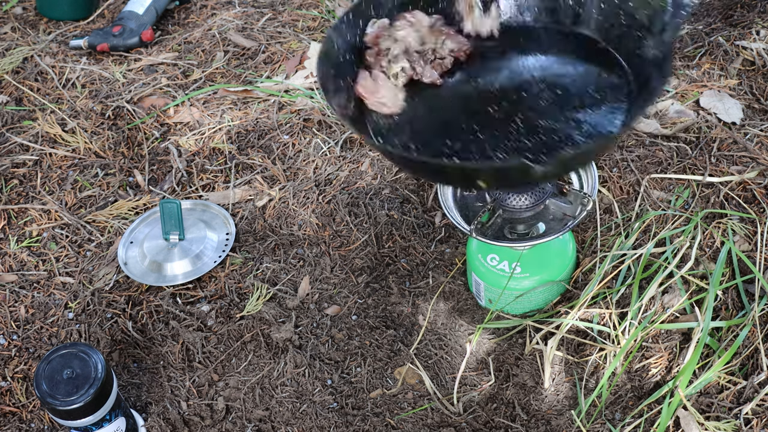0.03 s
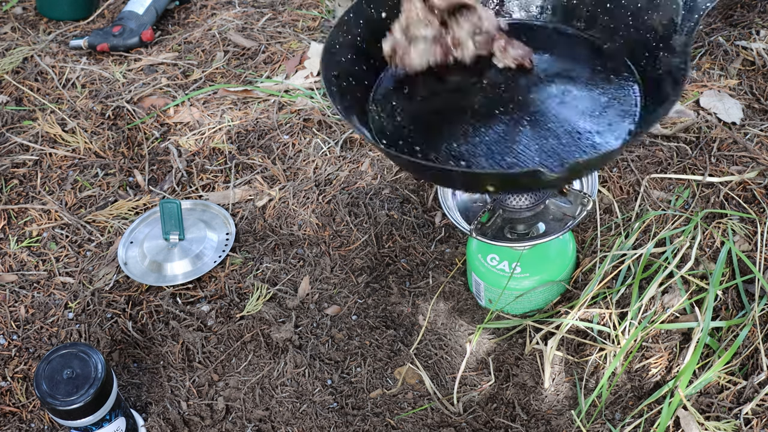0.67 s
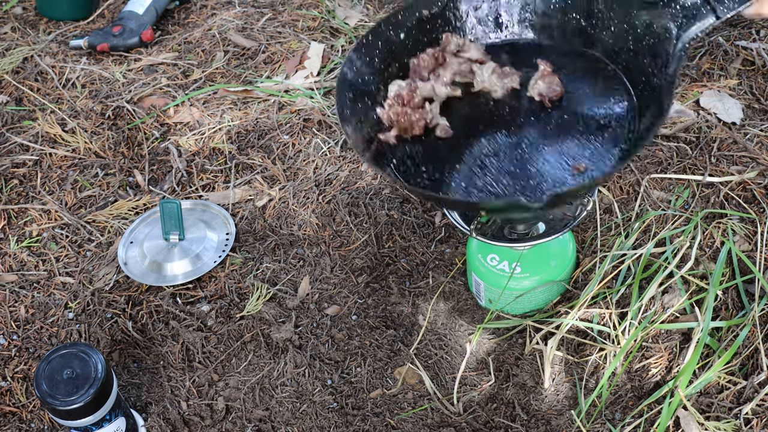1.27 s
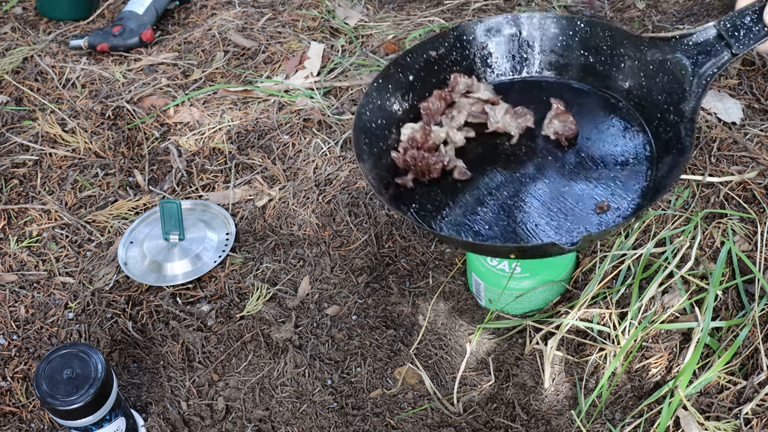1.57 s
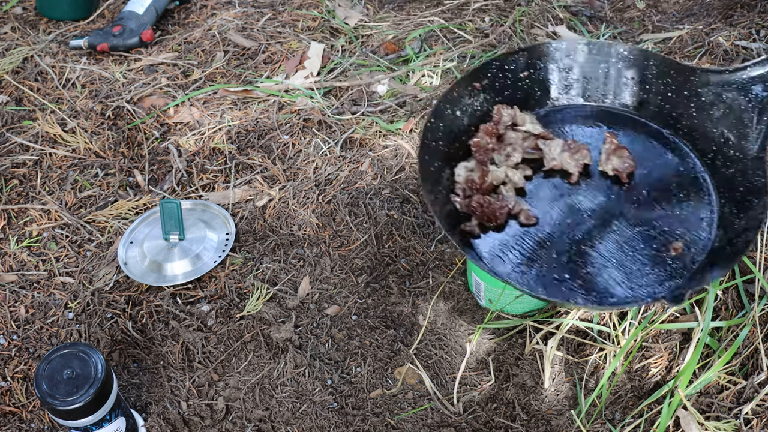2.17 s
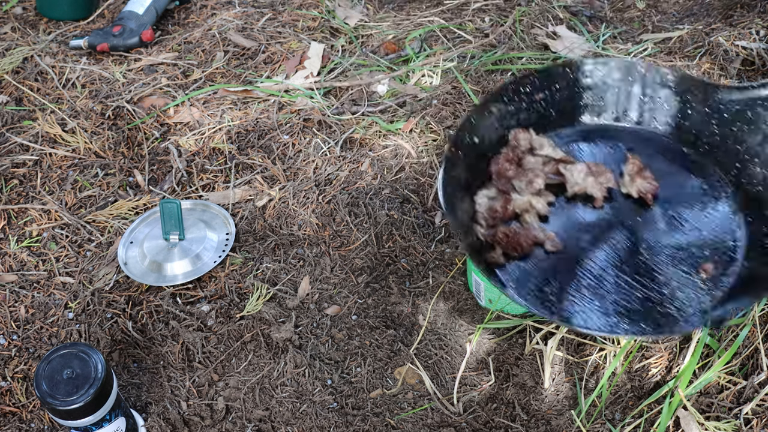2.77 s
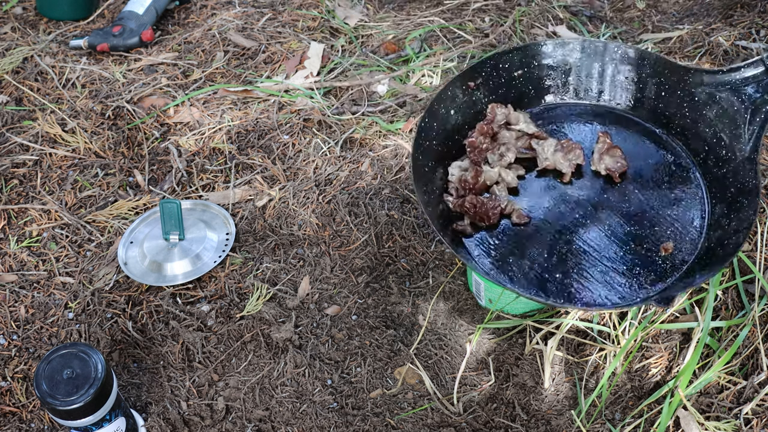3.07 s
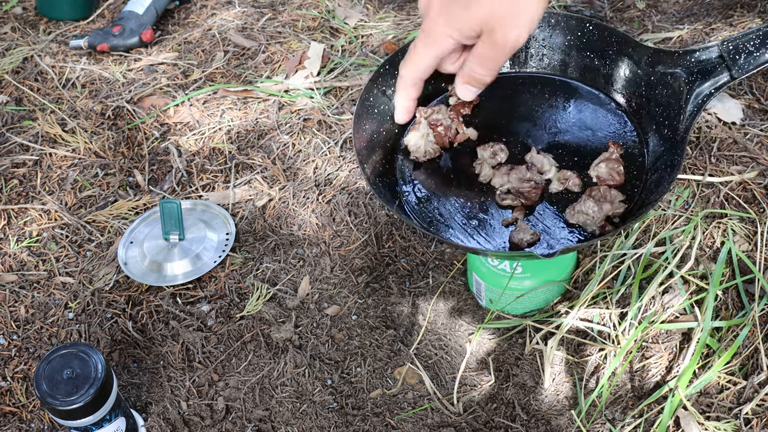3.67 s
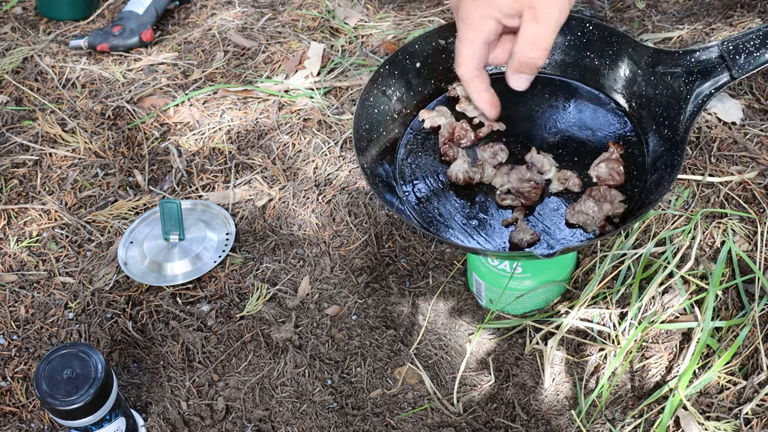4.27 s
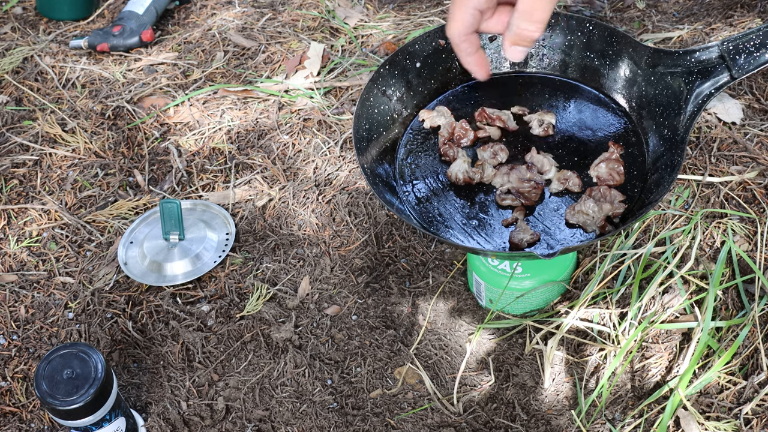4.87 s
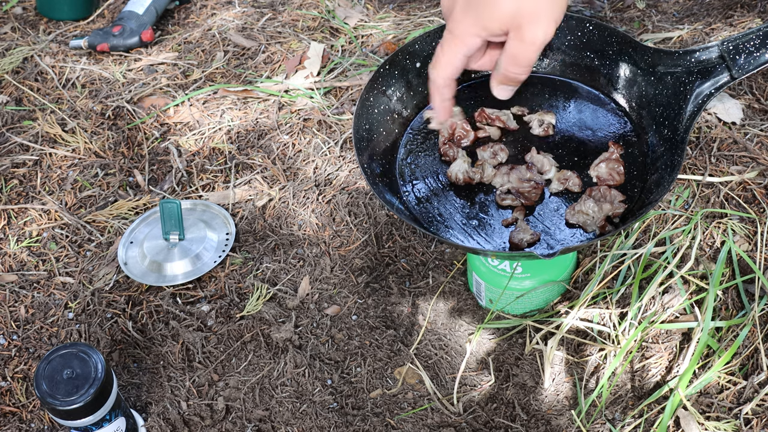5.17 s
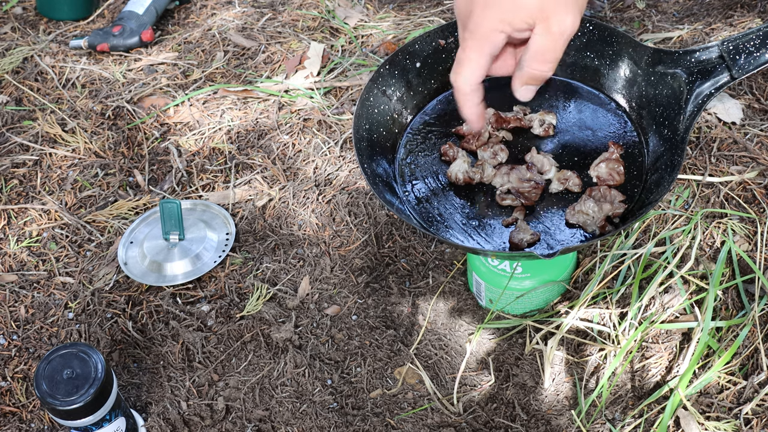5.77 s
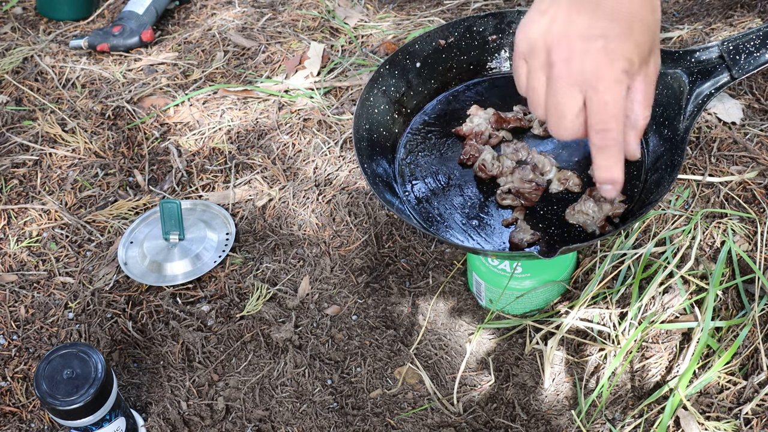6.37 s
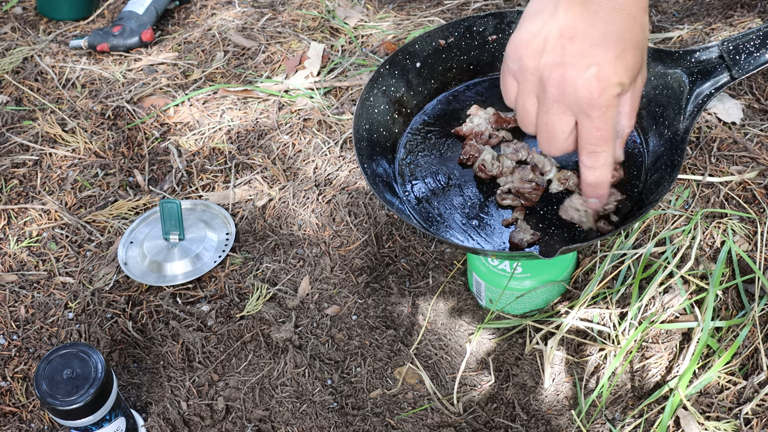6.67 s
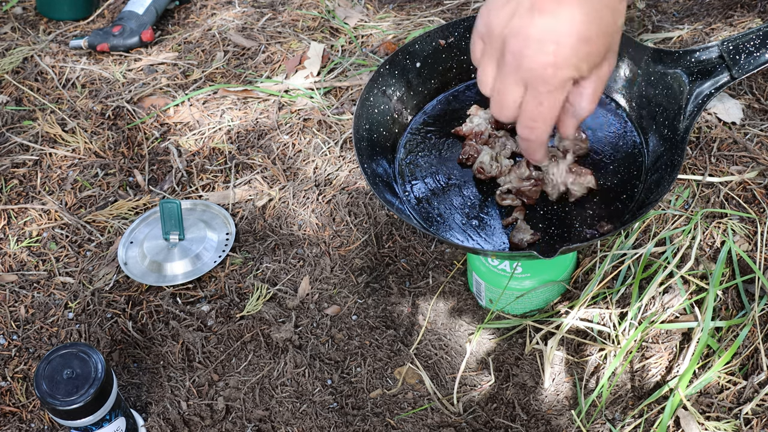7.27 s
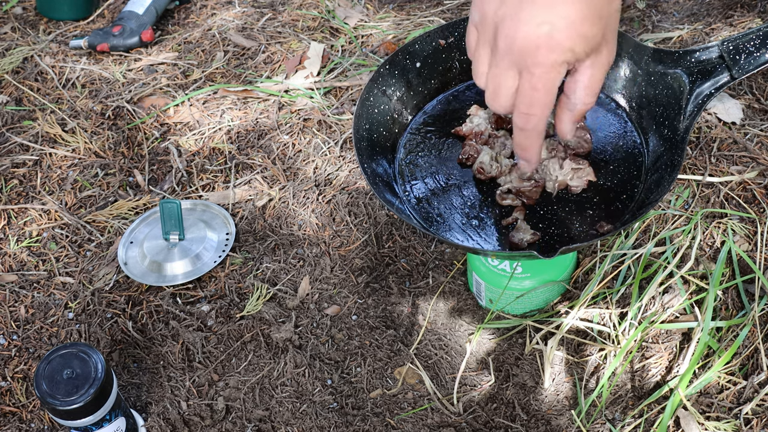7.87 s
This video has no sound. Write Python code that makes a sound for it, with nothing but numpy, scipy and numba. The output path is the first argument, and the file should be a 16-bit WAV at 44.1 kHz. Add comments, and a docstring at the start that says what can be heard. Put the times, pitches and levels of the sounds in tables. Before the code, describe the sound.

Food sizzles and pops in an iron skillet outdoors, with a few light metal knocks and a faint distant motor hum.

```python
"""Mushrooms frying on a camping stove

Mushrooms fry outdoors in a cast-iron skillet, close to the microphone. Countless tiny steam bubbles
burst in the fat and merge into a sizzle; bigger ones snap and thud, more so once a finger pushes the
pieces about. Shifted on the burner, the skillet knocks on its supports and rings. Far motors hum."""
import sys
import numpy as np
from scipy import signal
from scipy.fft import rfft, irfft
from scipy.io import wavfile
from scipy.ndimage import uniform_filter1d
from numba import njit

SR = 44100
rng = np.random.default_rng(int(sys.argv[2]) if len(sys.argv) > 2 else 0)


def output_pcm(signal):
    """Save a mono or channel-first signal as 16-bit PCM at the path in sys.argv[1].

    Samples are clipped to [-1, 1] before scaling.
    """
    pcm = np.clip(np.atleast_2d(signal).T, -1, 1) * 32767
    wavfile.write(sys.argv[1], SR, np.round(pcm).astype(np.int16))


N = 358974
T = np.arange(N) / SR


def undb(db):
    """Amplitude ratio of a level in decibels."""
    return 10 ** (np.asarray(db) / 20)


def unit_rms(x):
    """Normalisation to an rms of 1."""
    return x / np.sqrt(np.mean(x ** 2))


def at_energy(pulse, db):
    """Energy normalisation: the pulse carries as much as one millisecond of sound at this level."""
    return undb(db) * np.sqrt(SR / 1000) * pulse / np.linalg.norm(pulse)


def curves(rows):
    """Linear interpolation in time: one value per sample for each column after the first."""
    times, *columns = np.transpose(rows)
    return [np.interp(T, times, column) for column in columns]


def add(out, start_s, sound):
    """Superposition: a sound joins the mix at its start time."""
    i = max(int(start_s * SR), 0)
    out[..., i:i + sound.shape[-1]] += sound[..., :max(N - i, 0)]


def colour(x, points, size=2048):
    """Minimum-phase filter through (Hz, dB) points, scaled to unit power gain."""
    hz, db = np.transpose(points)
    bins_hz = np.maximum(np.fft.rfftfreq(size, 1 / SR), 1)
    magnitude = undb(np.interp(np.log(bins_hz), np.log(hz), db))
    cepstrum = irfft(np.log(magnitude))
    cepstrum[1:size // 2] *= 2
    cepstrum[size // 2 + 1:] = 0
    response = irfft(np.exp(rfft(cepstrum)))
    return signal.oaconvolve(x, response[None] / np.linalg.norm(response), axes=-1)[:, :N]


def wander(rate_hz):
    """Smooth random fluctuation with an rms of 1."""
    hold = int(SR / rate_hz)
    steps = np.repeat(rng.standard_normal(N // hold + 1), hold)
    return unit_rms(uniform_filter1d(uniform_filter1d(steps, hold), hold)[:N])


def wavering_tone(hz, db):
    """Random modulation: a sine wavers slightly in pitch and level."""
    phase = 2 * np.pi * np.cumsum(hz * (1 + 0.00325 * wander(rate_hz=3))) / SR
    return np.sqrt(2) * undb(db + wander(rate_hz=10)) * np.sin(phase)


@njit
def bandpass(x, hz, width_hz):
    """Second-order resonance with a moving centre, as a state-variable filter."""
    out, band_state, low_state = np.empty(len(x)), 0., 0.
    for i in range(len(x)):
        g, damping = np.tan(np.pi * hz[i] / SR), width_hz / hz[i]
        band = (band_state + g * (x[i] - low_state)) / (1 + g * (g + damping))
        band_state = 2 * band - band_state
        low_state += 2 * g * band
        out[i] = damping * band
    return out


def scattered_bursts(count, rise_s, decay_s, tail_s, apart, size):
    """Scattering off food and pan smears clicks into noise: count x 2 channels x size, mean energy 1."""
    t = np.arange(size) / SR
    noise = rng.standard_normal((count, 3, size))
    shared, separate = noise[:, :1], noise[:, 1:]
    onset = (1 - np.exp(-t / rise_s)) ** 2
    envelope = onset * np.exp(-t / decay_s)
    bursts = (shared + apart * separate) * envelope / envelope.max()
    bursts += undb(-21) * separate * onset * np.exp(-t / tail_s)
    energy = np.mean(np.sum(bursts ** 2, axis=-1), axis=-1)
    return bursts / np.sqrt(energy)[:, None, None]


# Spectrum of the outdoor air. Each row: frequency in Hz, relative level in dB.
AIR_SPECTRUM = [(20, -46), (42, -23), (60, 3.5), (130, 8.5), (250, 1), (370, 1.5), (520, 0), (1000, 5.5),
                (4000, -65)]
def outdoor_rumble():
    """Low-frequency noise, partly coherent between the channels; its level steps up midway."""
    noise = rng.standard_normal((3, N))
    level_db = np.interp(T, [3.48, 3.54], [-63, -57])
    return undb(level_db) * colour(noise[:1] + noise[1:], AIR_SPECTRUM)


# Hum lines that share one swell: partials of the first motor, plus the second motor's 225 Hz partial. Each row:
# frequency in Hz, level in dB before the swell.
MOTOR_PARTIALS = [(61.2, -57), (91.9, -59.5), (153.3, -64.5), (183, -67.5), (225, -67.5)]
# Their common swell. Each row: time in seconds, gain in dB.
MOTOR_SWELL = [(0, 0), (1.7, -1.5), (2.4, -7.5), (3.7, 1.5), (5.8, 3.5), (7.3, -3.5), (8.14, -5)]
# A second motor fades in and out. Each row: time in seconds, level in dB.
SECOND_MOTOR = [(0, -55), (.7, -44.5), (1.7, -47), (1.94, -52), (2.95, -53), (3.25, -43.5), (3.49, -43.5),
                (3.54, -51.5), (3.95, -56), (4.8, -46.5), (5.5, -45.5), (6.05, -50.5), (6.15, -62),
                (6.63, -56.5), (6.86, -47.5), (8.14, -50.5)]
def far_motors():
    """Periodic motion radiates a line spectrum: two motors hum, swelling and fading."""
    swell_db, = curves(MOTOR_SWELL)
    swelling_hum = sum(wavering_tone(hz, db + swell_db) for hz, db in MOTOR_PARTIALS)
    return swelling_hum + wavering_tone(113.7, *curves(SECOND_MOTOR))


# Faint ring of the skillet. Each row: time in seconds, level in dB.
FAINT_RING = [(0, -64), (.35, -55), (.8, -60.5), (1.2, -68)]
def faint_skillet_ring(hz=573):
    """A single mode of the skillet sounds faintly, swelling and fading in about the first second."""
    return wavering_tone(hz, *curves(FAINT_RING))


# Thumps beneath three of the bubble pops. Each row: start in seconds, energy level in dB, pitch in Hz.
POP_THUMPS = [(1.675, -27.5, 480), (4.4054, -26, 387), (5.644, -26.5, 420)]
def pop_thumps(decay_s=0.00078):
    """Heavily damped oscillation: a low, dull thump that dies within about a cycle."""
    out, t = np.zeros(N), T[:SR // 50]
    bass_cut = signal.butter(2, 180, "high", fs=SR)
    for start_s, db, hz in POP_THUMPS:
        thump = np.sin(2 * np.pi * hz * t) * np.exp(-t / decay_s)
        add(out, start_s, at_energy(signal.lfilter(*bass_cut, thump), db))
    return out


# Modes of skillet and burner. Each row: frequency in Hz, relative level in dB, base T60 in seconds.
IRON_MODES = [(580, -7.5, 0.17), (800, 3.5, 0.066), (975, 9.5, 0.048), (1047, 0, 0.3), (1130, 11.5, 0.037),
              (1245, 10, 0.042), (2143, 9, 0.19), (2460, 6, 0.2), (2573, 12.5, 0.13), (2864, 5, .07),
              (3240, 12, 0.07), (4705, 11, 0.1), (5356, 11, .07), (5733, 13, 0.05), (5992, 11, .05)]
def iron_ring(cutoff_hz, favoured_hz, t60_factor=1, contrast_db=7):
    """Modal vibration: the contact point favours some modes, and a soft contact weakens the high ones."""
    t, out = T[:SR // 2], 0
    for k, (hz, db, t60) in enumerate(IRON_MODES):
        nearness = np.exp(-(np.log(hz / favoured_hz) / 0.026) ** 2)
        amplitude = undb(db + contrast_db * (nearness - 1)) / np.hypot(1, (hz / cutoff_hz) ** 2)
        hz *= 1 + 0.0022 * rng.standard_normal()  # grip and supports detune the mode a little
        decay = np.exp(-np.log(1000) * t / (t60 * t60_factor))
        out = out + (-1) ** k * amplitude * np.sin(2 * np.pi * hz * t) * decay
    return out


# The skillet meets its supports. Each row: start in seconds, relative level in dB, contact cutoff
# in Hz, favoured frequency in Hz, factor on the ring time, relative scrape level in dB.
KNOCKS = [(1.8, -24.5, 4000, 1250, 0.62, -9), (1.842, -28.5, 1500, 1140, 3.7, -24),
          (2.196, -27, 1200, 1135, 1.7, -20), (3.028, -17, 7540, 2300, 0.69, -12),
          (3.075, -24, 1420, 1240, 0.85, -15), (3.201, -10.5, 1350, 952, 0.56, -23),
          (3.462, -25.5, 970, 970, 1.2, -8.5), (6.081, -12.5, 800, 1047, 1.06, -28)]
def skillet_knocks(contact_s=0.0067, scrape_s=0.035, slips_per_s=970):
    """Impact, then stick-slip friction: a gritty scrape keeps exciting the damped ring of the iron."""
    out, t = np.zeros((2, N)), T[:SR // 2]
    for start_s, db, cutoff_hz, favoured_hz, t60_factor, scrape_db in KNOCKS:
        ring = iron_ring(cutoff_hz, favoured_hz, t60_factor)
        scrape = undb(scrape_db) * np.exp(-t / scrape_s)
        slips = (rng.random(len(t)) < slips_per_s / SR) * rng.standard_normal(len(t)) * scrape
        noise = rng.standard_normal((3, len(t)))
        contact = (noise[:1] + 0.12 * noise[1:]) * (np.exp(-t / contact_s) + scrape / 2)
        band = signal.butter(2, [620, np.clip(1.2 * cutoff_hz, 1200, SR / 3)], "band", fs=SR)
        grit = signal.lfilter(*band, contact + 5 * slips)
        ring = ring + signal.fftconvolve(ring, slips / 2)[:len(t)]
        add(out, start_s, undb(db - 12) * (ring + undb(10) * grit))
    return out


# Spectrum of a tearing skin. Each row: frequency in Hz, relative level in dB.
SNAP_SPECTRUM = [(40, -25), (180, -20), (500, -19.5), (1400, -8.5), (2000, -9), (2700, -1), (4000, -2.5),
                 (6000, 8), (10500, 2.5), (12200, 10.5), (13500, -16), (16000, -14.5)]
def skin_snaps(rows):
    """Sudden rupture of a bubble or droplet radiates a broadband click, followed by its scatter."""
    out = np.zeros((2, N))
    bursts = scattered_bursts(len(rows), rise_s=9e-5, decay_s=0.00047, tail_s=0.0067, apart=0.71, size=900)
    bursts[:, :, 0] += undb(-2)  # the direct click
    low, high = signal.butter(2, 5000, fs=SR), signal.butter(1, 6500, "high", fs=SR)
    for (start_s, snap_db, bright_db, *_), burst in zip(rows, bursts):
        treble = undb(bright_db - 6.5) * signal.lfilter(*high, burst)
        snap = colour(signal.lfilter(*low, burst) + treble, SNAP_SPECTRUM)
        add(out, start_s, at_energy(snap, snap_db + 8))
    return out


def cavity_thuds(rows, tear_spread_s=0.001264, body_hz=306, average_bubble_hz=1157):
    """Damped resonance: a bubble gives way in a few irregular tears, each jolting its cavity."""
    out, t = np.zeros(N), T[:SR // 50]
    centre = len(t) // 2
    body = np.sin(2 * np.pi * body_hz * t) * np.exp(-t / 0.0018)  # the food shaken by the cavity
    radiation = signal.butter(2, [590, 2150], "band", fs=SR)  # too small a source for much bass
    scatter = np.clip(rng.standard_normal((len(rows), 2, 3)), -2, 2)
    for (start_s, _, _, thud_db, hz), (lags, sizes) in zip(rows, scatter):
        tears = np.zeros(len(t))
        tears[centre + (lags * tear_spread_s * SR).astype(int)] = undb(-13 + 10.5 * sizes)
        tears[centre] = 1  # the main tear
        cavity = signal.lfilter(*signal.iirpeak(hz, Q=1.9, fs=SR), tears)
        level_db = thud_db + 1.04
        add(out, start_s - t[centre], at_energy(signal.lfilter(*radiation, cavity), level_db))
        volume_ratio = (average_bubble_hz / hz) ** 3  # bigger, lower bubbles shake the food harder
        add(out, start_s, volume_ratio * at_energy(body, level_db - 20))
    return out


# Juicy bubbles burst, mostly under the pressing finger. Each row: start in seconds, then snap level,
# brightness and thud level in relative dB, then thud pitch in Hz.
JUICY_POPS = [(0.3443, -24.5, -15, -19.5, 1130), (0.482, -12, 29, -24, 1390),
              (0.506, -12.5, 7.5, -26, 1250), (0.626, -20.5, -18, -28.5, 1130),
              (1.0285, -13.5, 5, -26, 1440), (1.675, -20, -1, -23.5, 930), (2.72, -19.5, 10, -32, 1420),
              (3.2444, -16.5, 6.5, -18, 930), (3.247, -16, 15, -23, 1140),
              (3.5219, -8.5, -1.5, -15.5, 1200), (3.6953, -22, 5, -24, 1160), (3.983, -14, 4, -25, 1150),
              (4.026, -13, 6.5, -22, 1220), (4.4051, -11.5, 16, -23.5, 1260), (4.8234, -26, -1, -22, 1310),
              (4.9442, -13.5, 0.5, -11, 1270), (4.951, -6.5, 9, -18.5, 1450), (5.0193, -25, 5, -22.5, 1090),
              (5.1053, -16, 6.5, -16.5, 1100), (5.1423, -27, 2, -21.5, 1110),
              (5.1497, -15, 4.5, -26.5, 1210), (5.1646, -13, 2, -42, 1670), (5.4166, -17.5, 5, -15, 1200),
              (5.4994, -17.5, 1, -19, 1460), (5.5253, -21, -1, -19, 980), (5.6137, -8, 7, -19, 1634),
              (5.6254, -19, 4, -16, 1240), (5.6435, -13.5, 5, -17, 1160), (5.6802, -18, 2, -17.5, 1290),
              (5.716, -16.5, -23, -27, 1260), (5.7969, -18, -4, -14.5, 1300), (5.8243, -20.5, 5, -25, 1010),
              (5.9264, -20.5, 10, -18.5, 1110), (6.0196, -17, 12, -22.5, 1020),
              (6.0818, -14, 4, -12.5, 1200), (6.094, -6, 2, -12.5, 1500), (6.1013, -13, 4, -13.5, 1180),
              (6.3117, -25, 5, -21, 1150), (6.3431, -22, 6, -18, 1130), (6.3679, -22, 4, -23.5, 1160),
              (6.5658, -15, 3.5, -14, 1240), (6.5842, -21, 7, -18.5, 1140), (6.6632, -19, 10, -16.5, 1100),
              (6.671, -17, 18, -21, 1060), (6.69, -24.5, -9, -20.5, 1080), (6.7855, -21, -25, -18, 910),
              (6.849, -16, -1, -12.5, 1350), (6.9143, -23, 1, -21, 1100), (6.93, -18.5, 9, -15, 1160),
              (6.967, -21.5, 4, -23, 900), (7.265, -11.5, 4.5, -12, 1250), (7.3912, -15, -0.5, -20.5, 1190),
              (7.4942, -18.5, 2, -9.5, 1120), (7.6333, -15.5, 4, -23, 1250), (7.7265, -14, 4.5, -20, 1100),
              (7.8949, -20, 7, -22.5, 1130), (7.982, -17, 8, -18, 1090), (8.0511, -12, 4.5, -16.5, 1070)]
# Small wet clicks between them. Each row: start in seconds, relative thud level in dB.
WET_CLICKS = [(0.3354, -27), (1.01, -27.5), (4.043, -29.5), (4.09, -29.5), (4.788, -24.5), (4.99, -25),
              (5.303, -27), (5.3337, -24), (5.4698, -29.5), (5.814, -21), (6.294, -26.5), (6.509, -27.5),
              (6.683, -27), (7.0455, -24.5), (7.329, -21.5), (7.3543, -26), (7.4192, -22), (7.5343, -24.5),
              (7.568, -27), (8.032, -31.5)]
# Droplets spit in the fat with no thud. Each row: start in seconds, snap and brightness in relative dB.
DRY_SPITS = [(0.039, -21.5, -5), (0.813, -15.5, 26), (0.8795, -15, 9), (1.0414, -13, 9), (1.3547, -21, 20),
             (1.3752, -13, 20), (1.7896, -17.5, 8), (1.9746, -16.5, 22), (2.5111, -20.5, -2),
             (2.6541, -18.5, 7), (3.357, -22, 1.5), (3.6442, -22.5, 7), (3.9505, -19.5, 7),
             (4.0189, -19, 3), (4.1253, -14.5, 3.5), (4.2581, -17.5, 10), (4.2825, -21, 19),
             (4.8322, -14.5, 35), (5.2256, -17.5, 5), (5.2773, -17, 10), (5.5101, -18.5, -10),
             (5.5191, -17.5, 6), (5.8867, -19, 3.5), (6.1568, -15.5, 6.5), (6.1938, -18.5, 4),
             (6.3063, -17, 29), (6.4394, -19.5, 5), (6.6542, -19, 13), (7.0982, -14.5, 15),
             (7.3794, -18, 6.5), (7.332, -14, 13), (7.8908, -20, -15)]
def bubble_pops(click_hz=1120):
    """Transient excitation: single bursts snap and thud, and set the iron ringing faintly."""
    pitches = click_hz * np.exp(0.12 * rng.standard_normal(len(WET_CLICKS)))
    small_pops = [(start_s, db - 1, 0, db, hz) for (start_s, db), hz in zip(WET_CLICKS, pitches)]
    wet_pops = list(JUICY_POPS) + small_pops
    pops = skin_snaps(wet_pops + list(DRY_SPITS)) + cavity_thuds(wet_pops)
    ring = iron_ring(cutoff_hz=600, favoured_hz=1030)
    return pops + undb(-51) * signal.oaconvolve(pops, ring[None], axes=-1)[:, :N]


# Reflection off the pan wall. Each row: time in seconds, reference frequency of the bands in Hz,
# strength of the upper peak, strength of the lower peak.
WALL_BANDS = [(0, 7100, 0.23, 0.53), (1.24, 7740, 0.39, 0.49), (1.42, 7400, 0.44, 1.7),
              (1.72, 7860, 0.13, 0.71), (2.15, 9200, 0.8, 0), (2.42, 8800, 0.7, 0), (2.68, 10400, 0.82, 0),
              (3.08, 8000, 0.6, 0), (3.47, 8360, 2.2, 0.32), (3.6, 8000, 0, 0.11), (6.1, 8500, 0, 0),
              (6.7, 8800, 0.26, 0.97), (7.3, 8600, 0.078, 0.36)]
def wall_reflection(fat):
    """Interference reinforces two bands and weakens the one between; they slide as the pan tilts."""
    hz, upper, lower = curves(WALL_BANDS)
    def band(ratio, width_hz):
        return np.array([bandpass(side, ratio * hz, float(width_hz)) for side in fat])
    peaks = upper * band(0.96, width_hz=1540) + lower * band(0.67, width_hz=1100)
    dip = 0.48 * (upper + lower) * band(0.83, width_hz=850)
    share = np.array([[0.84], [1]])  # the left channel catches less of the reflection
    return fat + share * (peaks - dip)


# Frying while the food lies still. Each row: time in seconds, relative level in dB.
SIMMER = [(0, -30.5), (.76, -33), (.96, -35.5), (1.3, -29.5), (1.5, -26.5), (1.95, -27.5), (2.55, -30),
          (2.9, -31.5), (3.3, -30), (3.48, -31), (3.57, -39), (3.75, -34), (4.7, -31.5), (5.25, -34),
          (5.5, -32), (6.22, -32.5), (7.05, -26), (7.58, -30), (7.9, -27.5), (8.14, -29)]
# Food slides or is pressed onto hot iron. Each row: start and length in seconds, relative level in dB.
SURGES = [(0, 0.0099, -35), (0.087, 0.062, -32.5), (0.16, 0.12, -28.5), (0.351, 0.064, -25),
          (0.457, 0.078, -25), (0.551, 0.05, -31.5), (0.662, 0.039, -26.5), (0.758, 0.11, -23.5),
          (0.969, 0.078, -24), (1.058, 0.22, -24), (3.866, 0.18, -28.5), (4.085, 0.067, -27),
          (4.265, 0.039, -28.5), (4.761, 0.052, -31), (5.232, 0.22, -30), (5.466, 0.1, -30.5),
          (5.684, 0.027, -26.5), (5.833, 0.047, -28.5), (6.072, 0.014, -16.5), (6.14, 0.021, -32),
          (6.435, 0.069, -29.5), (6.654, 0.021, -25), (7.285, 0.07, -22), (7.416, 0.11, -30.5),
          (7.781, 0.035, -22.5)]
def frying_level(rise_share=0.4, release_s=0.019):
    """Incoherent sources add in power: the simmer plus steam surges that rise, hold and die, in dB."""
    power = undb(*curves(SIMMER)) ** 2
    for start_s, length_s, db in SURGES:
        rise = np.clip((T - start_s) / (rise_share * length_s), 0, 1)
        fall = np.exp(-np.clip((T - start_s - length_s) / release_s, 0, 20))
        power = power + (undb(db) * rise * fall) ** 2
    return 10 * np.log10(power)


def bubble_swarm(per_s, spread_db, max_spreads, decay_s, tail_s, spots):
    """Shot noise: bubbles burst at random, many small and few large, at several spots in the pan."""
    out = np.zeros((2, N))
    for burst in scattered_bursts(spots, rise_s=1e-4, decay_s=decay_s, tail_s=tail_s, apart=0.5, size=256):
        chance = rng.random(N) * SR * spots / per_s
        size_db = spread_db * np.minimum(-np.log(chance + 1e-12), max_spreads)
        impulses = (chance < 1) * undb(size_db) * rng.choice([-1, 1], N)
        out += signal.oaconvolve(impulses[None], burst, axes=-1)[:, :N]
    return unit_rms(out)


# Spectra of fine fizz, sparse crackle and juice. Each row: frequency in Hz, relative level in dB.
FIZZ_SPECTRUM = [(300, -31), (1000, -16), (2050, -12), (2600, -4.5), (3800, -5.5), (5400, -4), (6600, -2),
                 (7600, -0.1), (9000, -4.5), (10500, 0), (11200, 2.5), (12100, 3.5), (12900, 1.5),
                 (13500, 1), (15700, -14)]
CRACKLE_SPECTRUM = [(150, -31), (500, -13.5), (1200, 1.5), (2000, -7.5), (3000, -2.5), (6000, -1.5),
                    (12200, 9), (13500, -3), (16000, 2)]
JUICE_SPECTRUM = [(150, -10.5), (450, -8.5), (800, -8), (1250, 0), (1700, -5), (2400, -25), (5000, -12.5)]
# The fat's top treble, strongest while the pan lies open, weaker under the hand; and its middle and
# low range, thinnest as tossed food lands. Each row: time in seconds, gain in dB.
TREBLE_SHELF = [(0, -5), (1.3, 1), (2.7, 1.5), (3.45, 0), (3.6, 0.5), (4.7, -0.5), (6.3, -3), (8.14, -2.5)]
LOW_SHELF = [(.62, 0.5), (.79, -4), (.87, 1), (1.7, -2), (3.6, -0.5), (5.5, -0.5)]
# Bubbling of the juice, which grows as the finger squeezes. Each row: time in seconds, relative dB.
JUICE_LEVEL = [(0, -19), (1.1, -23.5), (3.2, -17.5), (4.0, -17), (6.2, -17.5), (8.14, -21)]
def sizzle():
    """Superposition of countless bursts: fizz and crackle of the fat over duller bubbling of the juice."""
    fry_db = frying_level()
    fizz = bubble_swarm(per_s=5500, spread_db=3.5, max_spreads=5.17, decay_s=18e-5, tail_s=0.012, spots=20)
    crackle = bubble_swarm(per_s=180, spread_db=6.5, max_spreads=3.36,
                           decay_s=9.6e-5, tail_s=0.0049, spots=12)
    flare = undb(fry_db + 1.23 * wander(rate_hz=69.2))  # the frying flickers a little
    fizz = undb(0.3) * flare * colour(fizz, FIZZ_SPECTRUM)
    crackle = undb(-19 + 0.5 * fry_db) * colour(crackle, CRACKLE_SPECTRUM)
    fat = wall_reflection(fizz + crackle)
    treble = signal.filtfilt(*signal.butter(3, 11500, "high", fs=SR), fat)
    fat += (undb(*curves(TREBLE_SHELF)) - 1) * treble
    lows = signal.filtfilt(*signal.butter(2, 4300, fs=SR), fat)
    fat += (undb(*curves(LOW_SHELF)) - 1) * lows
    juice = bubble_swarm(per_s=1900, spread_db=5.5, max_spreads=2.9,
                         decay_s=0.00022, tail_s=0.00054, spots=8)
    juice_db, = curves(JUICE_LEVEL)
    return fat + flare * undb(juice_db + 1.45) * colour(juice, JUICE_SPECTRUM)


# Position of the pan. Each row: time in seconds, leftward balance in dB, where centre_db is the middle.
PAN_BALANCE = [(0, 3.5), (1.3, 3.5), (2.2, 0.5), (2.8, -0.5), (3.3, -0.5), (3.55, 2.5), (8.14, 1.5)]
# Colour of the left channel against the right. Each row: frequency in Hz, relative difference in dB.
CHANNEL_COLOUR = [(500, -1), (830, 2.5), (1550, -6.5), (2300, -4), (2750, -.5), (4750, -1), (5300, -5.5),
                  (6500, -1), (7800, -6), (9400, -8), (11000, -5), (12800, 0), (14000, -1.5), (15500, 0)]
def scene(centre_db=4.5, left_lag_samples=2):
    """Level and time differences place the pan to the right: on the left it is softer and later."""
    skillet = bubble_pops() + sizzle() + pop_thumps() + skillet_knocks()
    balance_db, = curves(PAN_BALANCE)
    gains = undb(np.array([balance_db - centre_db, centre_db - balance_db]) / 2)
    gains /= np.sqrt(np.mean(gains ** 2, axis=0))
    left, right = gains * skillet
    left = colour(left[None], [(hz, db / 2) for hz, db in CHANNEL_COLOUR])[0]
    right = colour(right[None], [(hz, -db / 2) for hz, db in CHANNEL_COLOUR])[0]
    left = np.pad(left, (left_lag_samples, 0))[:N]
    return np.array([left, right]) + far_motors() + faint_skillet_ring() + outdoor_rumble()


# Narrow treble notches of the microphone. Each entry: frequency in Hz.
MIC_NOTCHES = [10640, 13300]
def record(dry, top_hz=15900):
    """Microphone response: two notches, clipping at full scale and a steep limit to the bandwidth."""
    for hz in MIC_NOTCHES:
        dry = signal.lfilter(*signal.iirnotch(hz, Q=70, fs=SR), dry)
    top_cut = signal.ellip(10, 0.2, 70, top_hz, fs=SR, output="sos")
    return signal.sosfilt(top_cut, np.clip(dry, -1, 1))


dry = scene()
out = record(dry)
output_pcm(out)
```